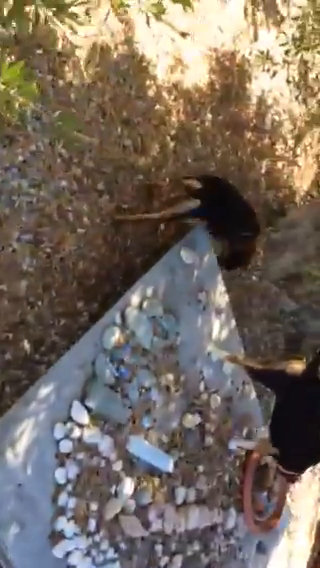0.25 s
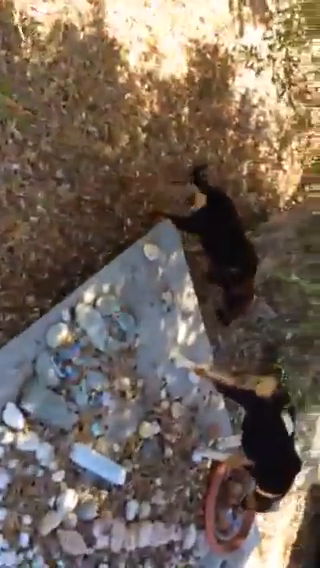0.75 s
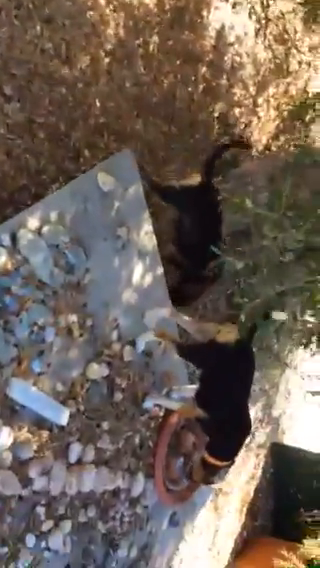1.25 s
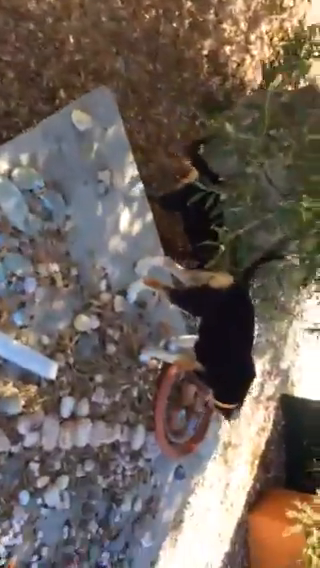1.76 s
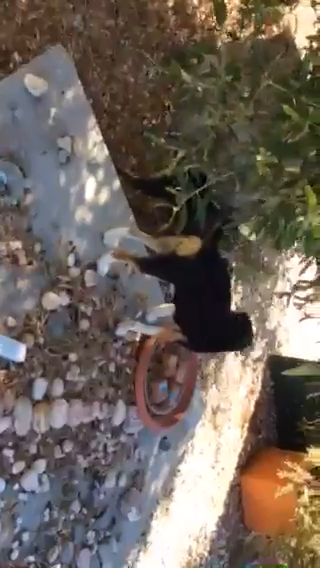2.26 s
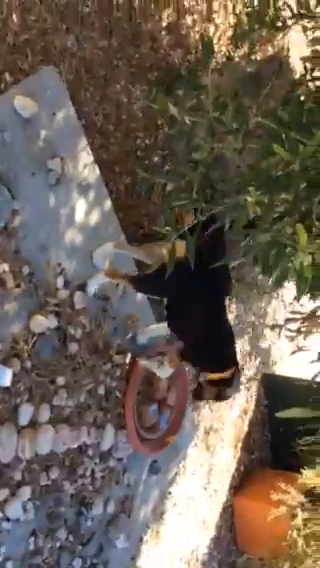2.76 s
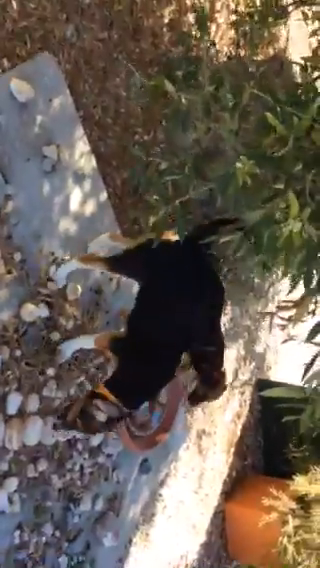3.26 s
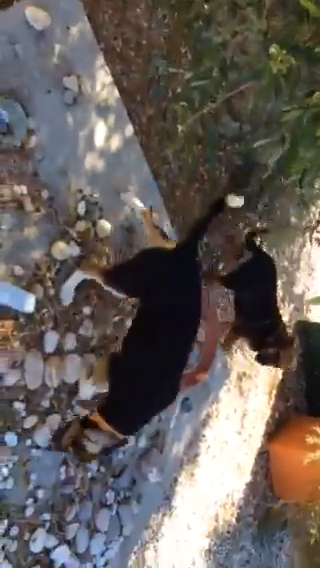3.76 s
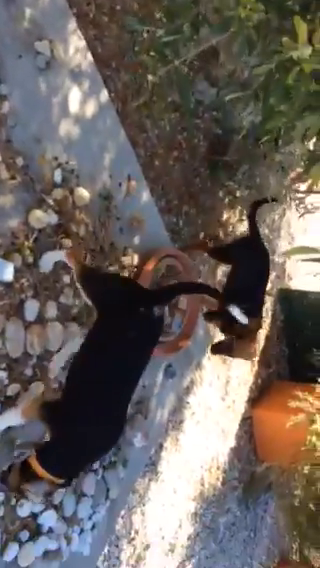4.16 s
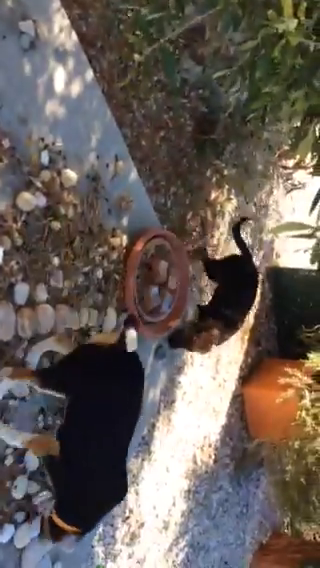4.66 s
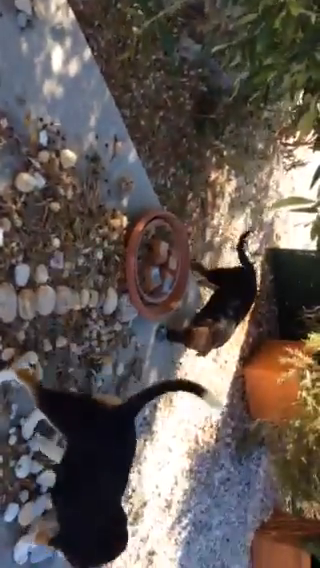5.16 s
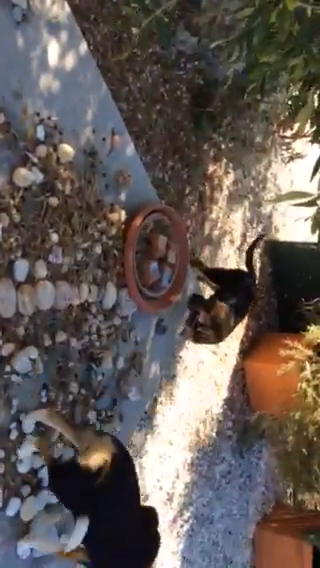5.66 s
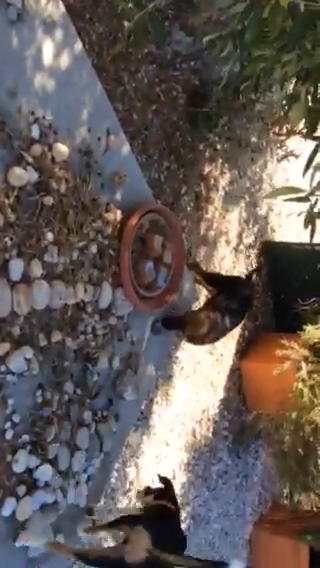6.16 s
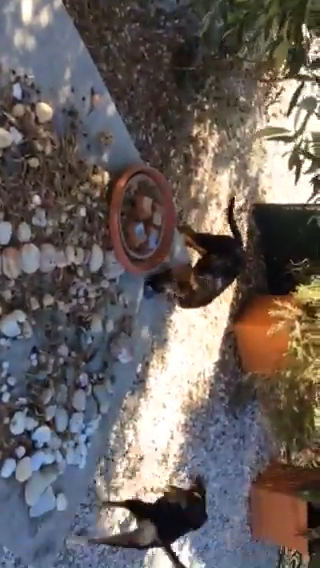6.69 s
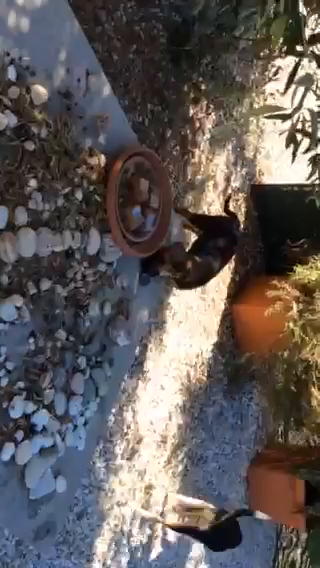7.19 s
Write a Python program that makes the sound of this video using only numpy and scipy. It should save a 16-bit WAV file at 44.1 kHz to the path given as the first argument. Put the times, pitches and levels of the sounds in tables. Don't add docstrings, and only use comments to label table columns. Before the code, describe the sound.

A handheld microphone in a garden catches shrill, unbroken cicadas and low, lumpy wind buffets, strongest around two and a half seconds. Two dogs pad about: faint rustles and small snaps at first, then sharp crackles, pebble clacks and dull thuds close by from three to five seconds, then sparser knocks farther off. Barely audible whimpers and a soft far traffic murmur lie behind.

```python
import sys
import numpy as np
from scipy import signal
from scipy.fft import rfft, irfft
from scipy.io import wavfile
from scipy.ndimage import uniform_filter1d

SR = 44100
rng = np.random.default_rng(int(sys.argv[2]) if len(sys.argv) > 2 else 0)


def makeup_ratio(level_db):
    decades = np.asarray(level_db, float) / 20
    return 10 ** decades


def generate_wav(signal):
    frames = np.transpose(np.atleast_2d(signal))
    scaled = np.clip(frames, -1, 1) * 32767
    pcm = np.round(scaled).astype(np.int16)
    wavfile.write(sys.argv[1], SR, pcm)


N = 327663
GAIN_STEP = 64


def evened(x):
    return x / np.sqrt(np.mean(x ** 2) + 1e-20)


def steadied(x, span_s):
    return x / np.sqrt(abs(uniform_filter1d(x ** 2, int(span_s * SR))) + 0.18)


def coloured(x, spectrum):
    hz, db = np.transpose(spectrum)
    f = np.fft.rfftfreq(N, 1 / SR)
    gain = makeup_ratio(np.interp(np.log(f + 1), np.log(hz + 1), db, -90, -90))
    return evened(irfft(rfft(x) * gain, N))


def resonate(x, hz, width_hz):
    return signal.lfilter(*signal.iirpeak(hz, hz / width_hz, SR), x)


def resonate_twice(x, hz, width_hz):
    return resonate(resonate(x, hz, width_hz), hz, width_hz)


def wander(per_s):
    smooth = uniform_filter1d(rng.standard_normal(N), int(SR / per_s / 4))
    return evened(signal.lfilter([1], [1, -np.exp(-2 * np.pi * per_s / SR)], smooth))


def crackle(per_s, spread_db, blur):
    size = makeup_ratio(spread_db * np.minimum(rng.exponential(1, N), 4))
    size = size * (rng.random(N) < per_s / SR)
    return evened(size * rng.choice([-1., 1.], N)) + blur * rng.standard_normal(N)


def add(mix, s, sound):
    part = mix[round(s * SR):][:len(sound)]
    part += sound[:len(part)]


def swell(s, hold_s, rise_s, fall_s, db):
    t = np.arange(0, N + GAIN_STEP, GAIN_STEP) / SR - s
    below = np.maximum(-t / rise_s, (t - hold_s) / fall_s)
    return makeup_ratio(db - 20 * np.maximum(below, 0))


def together(swells):
    total = np.sqrt(np.sum(np.square(swells), axis=0))
    return np.interp(np.arange(N) / GAIN_STEP, np.arange(len(total)), total)


def cicadas(count=3, near=0.42, burst=0.4):
    # [f/Hz, width/Hz, level/dB]
    tymbal = [(2876, 470, -6.5), (3192, 650, -8.5), (5135, 170, -10), (5500, 97, -22), (5424, 500, 1.5),
              (5714, 630, 3), (6270, 660, -12.5), (8294, 756, -4.5), (8720, 470, -12), (11500, 1140, -15.5),
              (14000, 2900, -25.5)]
    # [t/s, level/dB]
    chorus = [(0.0, -44.5), (0.95, -45.5), (1.14, -45.5), (1.7, -45.5), (2.73, -46), (3.0, -45.5),
              (3.31, -46), (5.75, -45.5), (5.96, -45), (6.31, -45.5), (6.97, -45), (7.43, -46)]
    # [beats per s, depth/dB]
    throbs = [(4.1, 0.27), (23.2, 0.31), (32.1, 0), (65.0, 0)]
    clicks_per_s = 232
    t = np.arange(N) / SR
    drive = rng.standard_normal(N)
    for _ in range(count):
        turns = np.cumsum(clicks_per_s * (1 + .012 * wander(3.))) / SR + rng.random()
        swell_db = 3.5 * np.clip(wander(2.5), -2, 1.5)
        rattle = np.exp(-(turns % 1) / burst) * rng.standard_normal(N)
        drive = drive + near * makeup_ratio(swell_db) * evened(rattle)
    drive = steadied(drive, .08)
    song = np.zeros(N)
    for hz, width_hz, db in tymbal:
        song += makeup_ratio(db + .5 * wander(7.1)) * resonate_twice(drive, hz, width_hz * 1.15)
    throb_db = sum(db * np.sin(2 * np.pi * per_s * t) for per_s, db in throbs)
    return makeup_ratio(np.interp(t, *np.transpose(chorus)) + throb_db + 2.0) * evened(song)


def steps():
    # [peak t/s, rise/s, fall/s, grinding stones level/dB, crackling leaves level/dB]
    near_steps = [(2.96, 0.092, 0.12, -67, -52), (3.05, 0.011, .12, -51, -47),
                  (3.112, .04, 0.11, -46, -39.5), (3.147, 0.018, 0.03, -43, -39),
                  (3.24, 0.028, 0.092, -54, -56), (3.36, 0.022, 0.038, -41.5, -46),
                  (3.41, .06, 0.025, -49.5, -53), (3.7, 0.062, 0.06, -42.5, -47),
                  (3.785, .03, .04, -54, -44), (3.802, 0.035, 0.032, -47, -35.5),
                  (3.85, 0.027, 0.052, -57, -49), (4.025, 0.02, 0.22, -50.5, -48),
                  (4.09, 0.066, 0.11, -53, -55), (4.14, 0.057, 0.057, -47, -46),
                  (4.165, .03, 0.042, -48, -45), (4.195, .03, 0.024, -57, -54),
                  (4.315, 0.0088, .05, -51, -58), (4.23, 0.0056, 0.025, -46, -41),
                  (4.36, 0.049, 0.058, -44.5, -45), (4.57, 0.08, 0.092, -56.5, -54),
                  (4.69, 0.025, 0.054, -55, -50), (4.765, 0.068, 0.23, -53.5, -56),
                  (5.0, 0.1, 0.055, -49.5, -55)]
    # [peak t/s, grinding stones level/dB, crackling leaves level/dB]
    far_steps = [(.09, -69, -63), (.29, -54.5, -53), (.36, -75, -74), (.71, -68, -54), (.81, -72, -62),
                 (.95, -76, -58), (1.15, -82, -60), (1.23, -65, -65), (1.38, -89, -70), (1.585, -82, -75),
                 (1.71, -63, -67), (1.9, -65, -77), (2.1, -63, -61), (2.21, -71, -61), (2.36, -63, -60),
                 (2.57, -83, -57), (2.7, -83, -64), (2.78, -68, -70), (2.85, -62.5, -62), (5.15, -65, -66),
                 (5.355, -58, -71), (5.5, -65.5, -73), (5.69, -59, -76), (5.89, -71, -69),
                 (5.963, -56, -78), (6.31, -57.5, -74), (6.44, -59, -68), (6.6, -65, -70), (6.7, -64, -60),
                 (6.77, -65, -62), (6.86, -63, -66), (7.01, -60, -66), (7.14, -59.5, -74)]
    # [f/Hz, width/Hz, level/dB]
    pebbles = [(173, 77, 2), (318, 185, 1.5), (371, 95, 5), (643, 140, 1.5), (877, 250, 3),
               (1140, 350, 0.5), (1420, 1300, -10.5), (2550, 620, 0)]
    # [f/Hz, level/dB]
    leaf_colour = [(1500, -6), (3000, 5.5), (6000, 7), (9000, 7.5), (12000, 8.5), (16000, 8.5)]
    far_rise_s, far_fall_s = 0.084, 0.14
    rows = near_steps + [(s, far_rise_s, far_fall_s, *dbs) for s, *dbs in far_steps]
    grind = together([swell(s, 0, rise, fall, db) for s, rise, fall, db, _ in rows])
    crush = together([swell(s, 0, rise, fall, db) for s, rise, fall, _, db in rows])
    grind = grind + makeup_ratio(-77.5 + 4.8 * wander(8.0))
    crush = crush + makeup_ratio(-66.5 + 2.2 * wander(9.))
    stones = np.zeros(N)
    for hz, width_hz, db in pebbles:
        knocks = crackle(90, 3.9, blur=0.72)
        stones += makeup_ratio(db) * evened(resonate(resonate(knocks, hz, width_hz), hz, 3 * width_hz))
    leaves = coloured(crackle(3200, 0.89, blur=1.0), leaf_colour)
    return grind * evened(stones) + crush * leaves


def thuds():
    # [peak t/s, peak level/dB, f/Hz, grit level/dB]
    paws = [(3.046, -47, 318, 2), (3.1455, -22, 371, -13.5), (3.1508, -31.5, 371, -20),
            (3.157, -44, 352, -15), (3.2, -43, 150, -25), (3.3, -50, 150, -25), (3.662, -39, 330, -23),
            (3.688, -37, 350, -20), (3.702, -41, 330, -20), (4.032, -40, 200, -20), (4.043, -39, 200, -20),
            (4.064, -33, 483, -20), (4.083, -38, 400, -14), (4.192, -39, 383, -20),
            (3.2578, -36.5, 350, -31), (3.3824, -26.5, 183, -29), (3.6824, -27.5, 348, -18),
            (3.393, -39, 149, -25), (3.41, -36, 169, -26), (3.67, -40, 330, -20), (3.695, -33, 350, -14),
            (3.811, -40, 150, -25), (6.962, -41, 256, -19), (7.027, -32, 231, -27), (7.15, -38, 263, -30),
            (3.803, -32, 448, -21), (4.023, -37, 440, -20), (4.0531, -34.5, 403, -8),
            (4.1337, -32, 414, -19), (4.165, -37, 300, -10), (4.1806, -34.5, 398, -21),
            (4.314, -35.5, 360, -13), (4.354, -22.5, 430, -11.5), (4.3747, -26, 363, -28),
            (4.398, -31.5, 284, -21), (4.569, -51, 348, -18), (4.762, -38, 289, -25),
            (4.789, -35, 287, -11), (4.828, -41, 264, -20), (4.99, -47, 398, -4), (4.999, -56, 200, -22),
            (5.382, -28, 327, -32), (5.456, -39, 310, -28), (5.506, -32.5, 293, -17),
            (5.6207, -37, 323, -18), (5.7312, -37.5, 327, -25), (5.8377, -41.5, 342, -23),
            (6.313, -37, 232, -22), (6.7, -45, 328, -15), (6.72, -46, 352, -18), (6.8436, -34.5, 355, -24),
            (6.929, -38.5, 224, -19), (6.989, -36, 300, -33), (7.009, -19, 323, -24),
            (7.135, -28.5, 194, -42)]
    # [peak t/s, peak level/dB, f/Hz]
    pebble_knocks = [(0.806, -31.5, 513), (1.1511, -42, 456), (1.152, -50, 900), (1.1515, -47, 1150),
                     (.951, -46, 600), (.952, -54, 1000), (1.217, -45, 880), (3.045, -44, 704),
                     (3.093, -44, 785), (3.676, -34, 850), (3.722, -43, 1000), (3.84, -40, 2050),
                     (4.036, -39, 830), (4.086, -39, 900), (4.113, -40, 910), (4.147, -38, 700),
                     (1.38, -46.5, 715), (1.588, -45, 1260), (1.737, -44, 453), (2.995, -41.5, 985),
                     (3.1178, -32, 872), (3.3561, -27.5, 874), (3.419, -47, 407), (3.446, -42, 400),
                     (3.693, -34, 1180), (3.708, -36, 890), (3.713, -34, 2000), (3.8, -34, 940),
                     (3.85, -45, 950), (.292, -43, 1380), (.345, -48, 900), (0.808, -39, 870),
                     (4.023, -37, 850), (4.048, -33, 920), (4.0638, -24.5, 815), (4.096, -34, 596),
                     (4.134, -35, 790), (4.16, -34, 586), (4.1077, -30, 840), (4.231, -47, 795),
                     (4.553, -42.5, 1200), (4.693, -35, 636), (4.6945, -38, 1030), (4.752, -40, 800),
                     (4.995, -36, 844), (4.993, -41, 1220), (4.758, -41, 1150), (4.782, -35.5, 1040),
                     (5.34, -39, 605), (5.3553, -31, 1010), (5.6873, -37, 920), (6.315, -45, 680),
                     (6.37, -45, 850), (7.008, -37, 625), (7.009, -40.5, 980), (7.091, -52, 950),
                     (5.889, -41.5, 970), (5.96, -49, 1275), (5.975, -41, 900), (6.31, -45, 700),
                     (6.2793, -30, 930)]
    crest_s = 0.0031
    thud_t60_s, knock_t60_s, knock_grit_db = 0.02, 0.016, -15
    lead = 300
    rows = [(*row, thud_t60_s) for row in paws]
    rows += [(*row, knock_grit_db, knock_t60_s) for row in pebble_knocks]
    out, t = np.zeros(N), np.arange(-lead, 2700) / SR
    for s, db, hz, grit_db, t60 in rows:
        rise = np.exp(-(t * hz / 0.87) ** 2)
        fall = makeup_ratio(-60 * (np.hypot(t, crest_s) - crest_s) / np.clip(t60, .008, .12))
        fade = np.where(t < 0, rise, fall)
        swing = np.cos(2 * np.pi * hz * t) + 0.18 * np.cos(2 * np.pi * 0.56 * hz * t)
        grit = evened(resonate(resonate(rng.standard_normal(len(t)), 540, 590), 500, 720))
        blow = makeup_ratio(db) * fade * (swing / 2.46 + makeup_ratio(grit_db) * fade * grit)
        add(out, s - lead / SR, blow)
        add(out, s - lead / SR + .017, 0.16 * blow)
    return out


def snaps():
    # [t/s, peak level/dB, centre f/Hz, body level under the
    # crack/dB]
    snap_rows = [(0.094, -28, 14700, -26), (0.3621, -34, 9780, -14), (0.411, -32, 14000, -16),
                 (0.7017, -33, 11400, -20), (1.218, -29.5, 11300, -18), (1.484, -30, 12800, -27),
                 (1.7072, -31, 11500, -14), (2.852, -31, 13500, -9), (2.906, -34, 9000, -9),
                 (2.9564, -24, 12100, -7), (3.0473, -36, 11000, -15), (3.0508, -31, 11500, -15),
                 (3.093, -23, 11500, -8), (3.111, -31, 12500, -21), (3.143, -18, 11800, -6),
                 (3.2335, -18, 13500, -27), (3.3059, -33, 13100, -13), (3.6773, -38, 11500, -10),
                 (3.7022, -34, 11500, -8), (3.795, -32, 10000, -3), (3.7205, -25, 12200, -10),
                 (3.7803, -30, 11300, -7), (3.799, -21, 11300, -13), (3.84, -24.5, 12200, -5),
                 (4.0247, -36, 11000, -12), (4.135, -32, 12000, -20), (4.1699, -31, 11900, -8),
                 (4.229, -22, 12900, -20), (4.3365, -44, 11600, -12), (4.3685, -40, 10900, -12),
                 (4.6758, -37, 12000, -17), (4.692, -20, 12300, -8), (4.7556, -37, 11600, -10),
                 (5.0055, -35, 11100, -10), (6.7635, -37, 9990, -14),
                 (3.147, -23, 11000, -11),
        (3.152, -26, 10000, -14),
        (3.158, -32, 10000, -12),
        (3.2268, -36, 13500, -20),
        (3.802, -26, 11400, -14),
        (3.806, -30, 10500, -10),
        (3.811, -25, 11000, -17),
        (3.849, -31, 12500, -17),
    ]
    out, t = np.zeros(N), np.arange(1500) / SR
    fade = makeup_ratio(-60 * t / .0015) + .2 * makeup_ratio(-60 * t / .006) + .07 * makeup_ratio(-60 * t / .04)
    fade = fade * np.minimum(t / .00015, 1)
    for s, db, hz, body_db in snap_rows:
        burst = rng.standard_normal(len(t)) * fade
        crack = resonate_twice(burst, hz, 5200)
        body = resonate_twice(burst, 2660, 5200)
        snap = crack / abs(crack).max() + makeup_ratio(body_db) * body / abs(body).max()
        add(out, s + .0004, makeup_ratio(db - 0.5) * snap)
    return out


def whimpers():
    # [t/s, length/s, f/Hz, level/dB, octave level/dB]
    cries = [(1.675, 0.87, 651, -79, -25), (2.047, 0.035, 765, -66.5, -25), (2.192, 0.084, 1000, -69, -20),
             (2.908, 0.04, 1040, -68.5, -22), (2.954, 0.04, 990, -65, -22), (4.837, 0.061, 614, -63, -9),
             (6.198, 0.082, 500, -63.5, -19), (6.38, 0.21, 570, -70.5, -17), (7.28, 0.21, 604, -72, -13),
             (7.3, 0.12, 1190, -74, -25), (0.609, .06, 756, -75, -25)]
    breathy = 0.44
    out, waver, flutter, unsteady = np.zeros(N), wander(32.0), wander(25.), wander(70.)
    for s, length, hz, db, octave_db in cries:
        t, at = np.arange(int(length * SR)) / SR, round(s * SR)
        arch = 0.034 * np.sin(np.pi * t / length)
        pitch = hz * (1 + arch + 0.022 * np.resize(waver[at:], len(t)))
        phase = 2 * np.pi * np.cumsum(pitch) / SR
        flutter_db = 1.5 * np.resize(flutter[at:], len(t))
        level = makeup_ratio(db + 8.5 + flutter_db) * np.sqrt(np.hanning(len(t)))
        smear = 1 + breathy * np.resize(unsteady[at:], len(t))
        tone = np.sqrt(abs(smear)) * np.sin(phase)
        octave = makeup_ratio(octave_db) * smear * np.sin(2 * phase)
        add(out, s, level * (tone + octave))
    return out


def breeze():
    # [f/Hz, level per Hz/dB]
    eddy = [(15, -47), (25, -25), (59, 4), (96, 1), (178, -6.5), (220, -11.5), (574, -35), (900, -43),
            (1170, -41), (1980, -120)]
    # [start t/s, hold/s, level/dB]
    gust_rows = [(0.0, 0.4, -42), (0.49, 0.12, -50.5), (0.768, 0.022, -48), (.93, 0.12, -63),
                 (1.295, 0.64, -48), (2.16, 0.019, -49), (2.3, 0.38, -48.5), (2.796, 0.12, -49.5),
                 (1.16, 0.11, -58.5), (3.814, 0.084, -60.5), (4.985, 0.043, -61), (6.29, .06, -61),
                 (6.51, 0.071, -68), (6.695, 0.038, -56)]
    # [peak t/s, peak level/dB, f/Hz]
    buffets = [(0.074, -30, 100), (0.145, -30.5, 89.5), (0.2666, -31.5, 143), (0.3796, -29.5, 162),
               (0.44, -36, 138), (0.596, -34.5, 109), (0.6829, -37, 189), (1.086, -42.5, 130),
               (1.544, -30.5, 124), (1.651, -30, 117), (1.6657, -29, 138), (1.774, -35.5, 157),
               (2.3605, -23.5, 139), (2.398, -29.5, 185), (2.4653, -24, 138), (2.5063, -32, 161),
               (2.517, -32.5, 135), (2.5636, -29, 207), (2.5671, -16.5, 224), (2.633, -36.5, 138),
               (2.703, -29, 124), (2.8205, -38, 203)]
    # [peak t/s, peak level/dB, f/Hz]
    flaps = [(0.037, -31.5, 244), (0.163, -30, 249), (0.245, -32.5, 244), (0.338, -36, 180),
             (.008, -31, 130), (0.188, -46, 110), (.257, -26, 140), (0.278, -28, 109), (.302, -41, 120),
             (.543, -37.5, 89), (2.904, -46, 200), (1.323, -35, 105), (1.404, -40, 110), (1.51, -36, 110),
             (1.669, -35, 253), (1.834, -36.5, 90), (2.425, -34, 100), (2.486, -36, 120),
             (2.548, -31.5, 191), (2.581, -36, 110), (2.683, -31, 109), (2.384, -30, 232),
             (2.56, -33.5, 464), (3.397, -44, 169), (3.269, -46, 150), (3.33, -52, 150), (3.43, -50, 150),
             (3.459, -51, 140), (4.17, -45, 120), (5.47, -49, 200), (5.55, -50, 200), (6.9, -50, 200),
             (4.81, -43, 270), (4.8, -42, 280), (4.82, -44, 260), (7.007, -33, 181), (4.908, -52, 200),
             (7.023, -40, 236)]
    gust_rise_s, gust_fall_s = 0.049, 0.031
    churn_rise_s, churn_fall_s = 0.035, 0.026
    churn_top_db, churn_db = -23.5, -7.5
    lumps = rng.standard_normal(N) * makeup_ratio(3.1 * wander(26.0))
    rumble = steadied(coloured(lumps, eddy), 0.059)
    gains = [swell(s, hold, gust_rise_s, gust_fall_s, db) for s, hold, db in gust_rows]
    for s, db, _ in buffets:
        gains.append(swell(s, 0, churn_rise_s, churn_fall_s, min(db, churn_top_db) + churn_db))
    out = together(gains) * rumble
    half = 900
    t = np.arange(-half, half) / SR
    for s, db, hz in buffets + flaps:
        bell = np.exp(-(t * hz / 0.43) ** 2)
        swing = bell * np.cos(2 * np.pi * hz * t + rng.uniform(-1.46, 1))
        offset = bell * swing.sum() / bell.sum()
        add(out, s - half / SR, makeup_ratio(db) * (swing - 0.52 * offset))
    return out


def yard():
    # [f/Hz, level per Hz/dB]
    air = [(18, -31), (30, 5.5), (171, 6), (225, 2.5), (336, -5), (491, -6), (998, -5), (1690, -9.5),
           (2300, -25), (2990, -40), (5060, -120)]
    # [f/Hz, level/dB]
    hiss = [(1500, -44), (2500, 16.5), (4300, -3), (7200, 16.5), (10000, 11), (12800, 7.5), (16000, -12)]
    murmur_db = -63.3 + 1.6 * np.clip(wander(11.0), -1, 2)
    murmur = makeup_ratio(murmur_db) * coloured(rng.standard_normal(N), air)
    return murmur + makeup_ratio(-56) * coloured(rng.standard_normal(N), hiss)


def dappled(x):
    x = x - .32 * resonate(x, 4300, 450)
    z = signal.stft(x, nperseg=512)[2]
    patches = uniform_filter1d(rng.standard_normal(z.shape[::-1]).T, size=3, axis=0)
    patches = uniform_filter1d(patches, size=7, axis=1)
    return signal.istft(z * makeup_ratio(1.0 * evened(patches)), nperseg=512)[1][:N]


def scene():
    far = dappled(cicadas() + yard())
    dogs = steps() + thuds() + snaps() + whimpers()
    return (far + dogs + breeze())[None]


def thinned(x):
    # [f/Hz, share]
    dropped = [(3300, 0), (3900, .03), (4500, 0), (6000, 0), (6600, .03), (9300, .03), (9600, .14),
               (11700, .1), (12000, .2), (12500, .35), (12950, .7), (13500, .33), (14000, .2), (14500, .25),
               (15000, .6), (15700, .72), (15800, 1)]
    hz, _, z = signal.stft(x, SR, "cosine", nperseg=2048)
    patch = uniform_filter1d(uniform_filter1d(abs(z) ** 2, size=6, axis=0), size=2, axis=1)
    whim = uniform_filter1d(rng.standard_normal(z.shape), size=14, axis=0)
    whim = uniform_filter1d(whim, size=3, axis=1)
    patch = patch * makeup_ratio(4.5 * evened(whim))
    rank = patch.argsort(axis=1).argsort(axis=1) / patch.shape[1]
    kept = rank >= np.interp(hz, *np.transpose(dropped))[:, None]
    return signal.istft(z * kept, SR, "cosine", nperseg=2048)[1][None, :N]


def top_cut(x):
    return signal.sosfilt(signal.butter(12, 16630, fs=SR, output="sos"), x)


def record(dry):
    bass_cut = signal.butter(4, 38, "high", fs=SR, output="sos")
    mix = thinned(signal.sosfilt(bass_cut, dry[0]))
    return top_cut(mix)


dry = scene()
out = record(dry)
generate_wav(out)
```